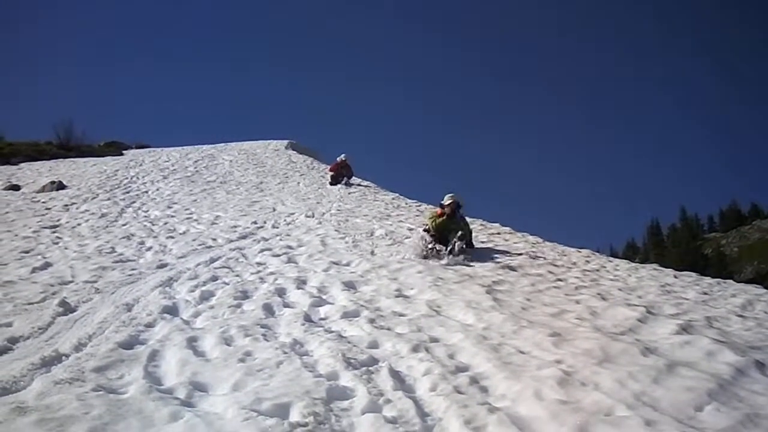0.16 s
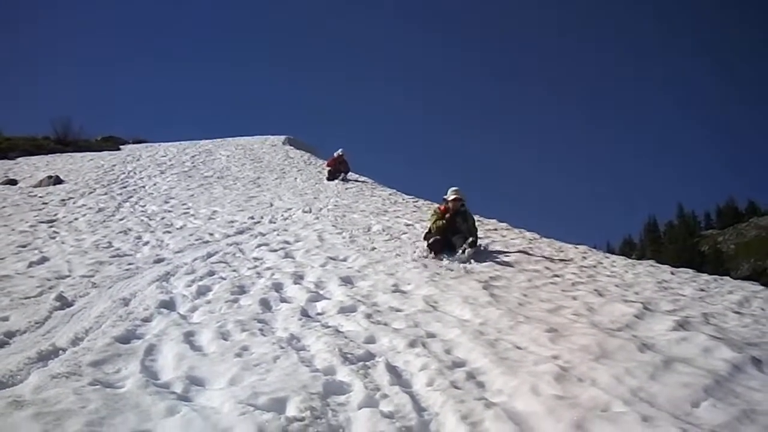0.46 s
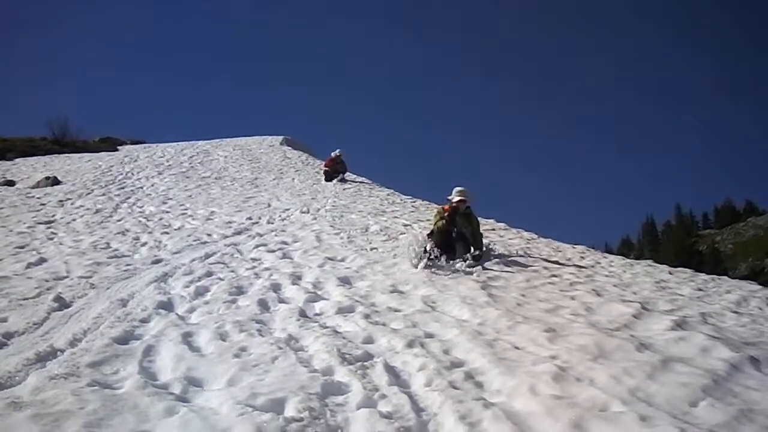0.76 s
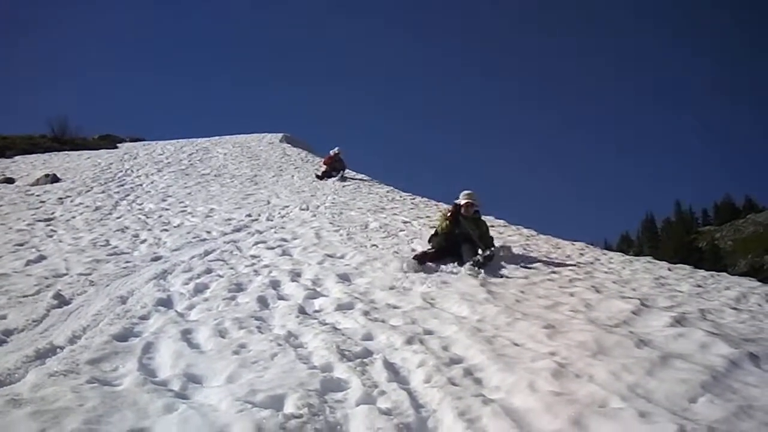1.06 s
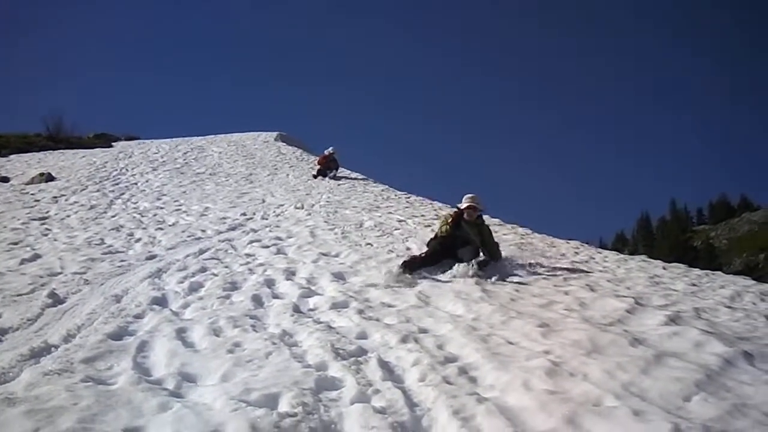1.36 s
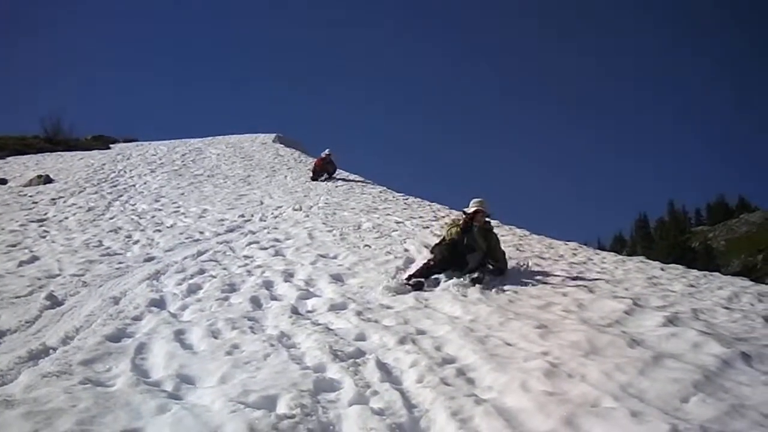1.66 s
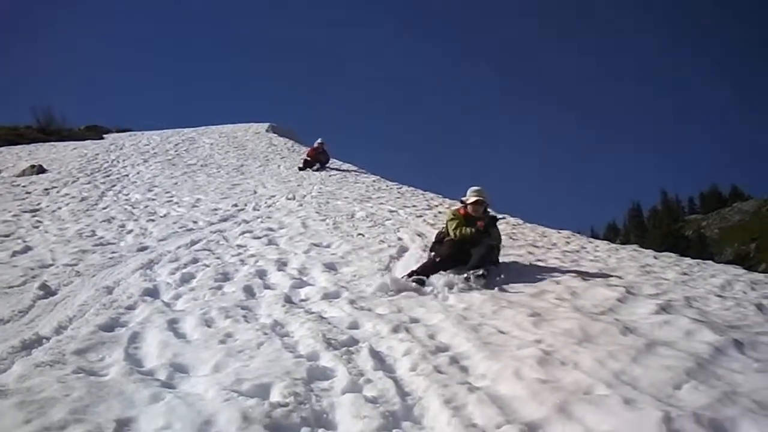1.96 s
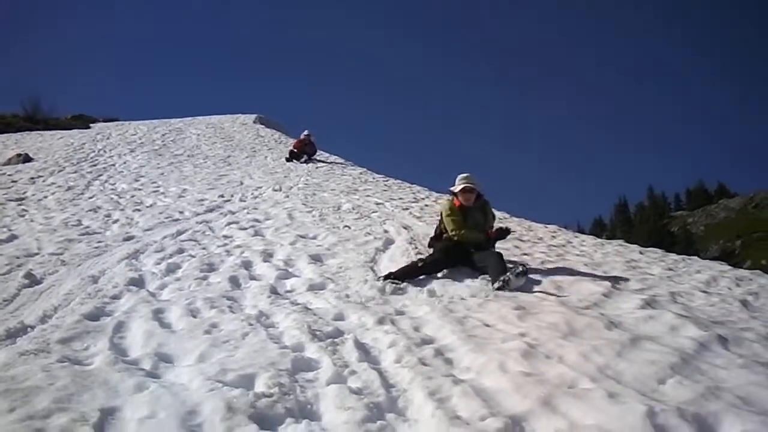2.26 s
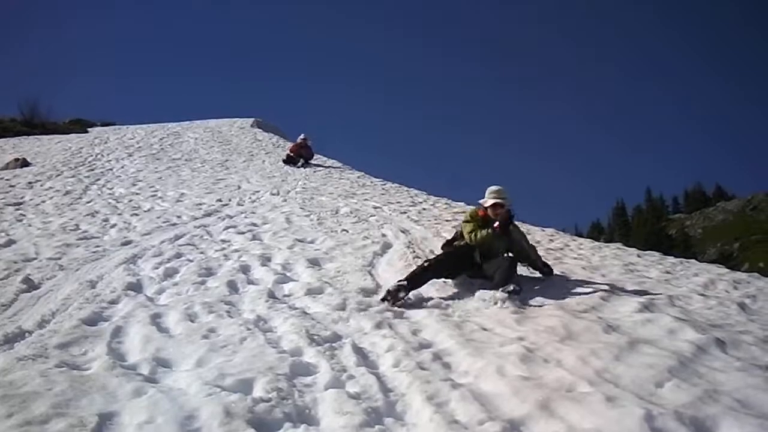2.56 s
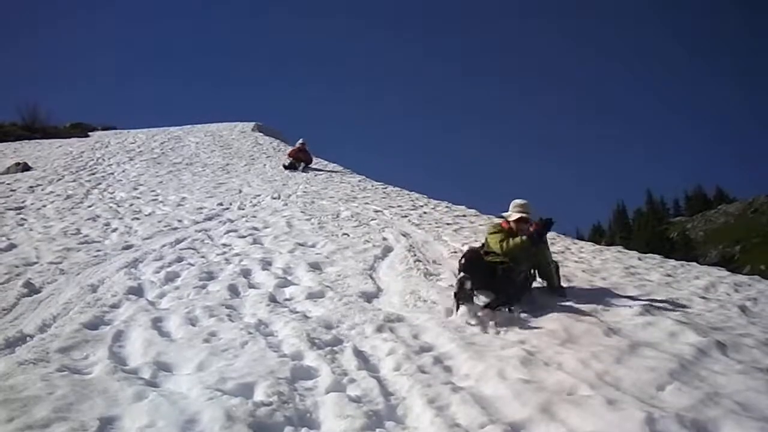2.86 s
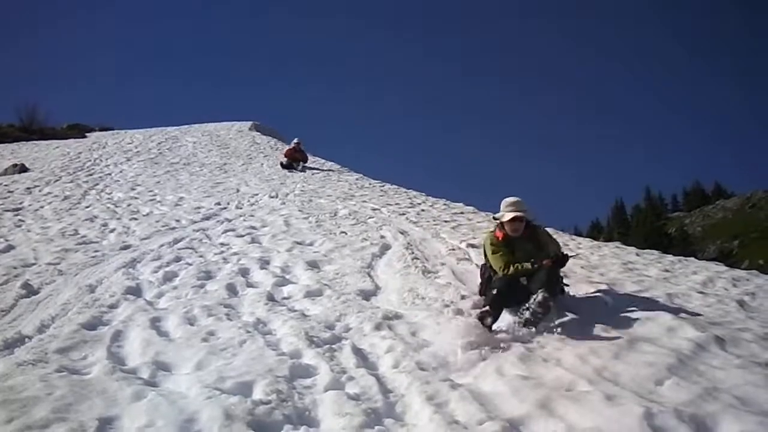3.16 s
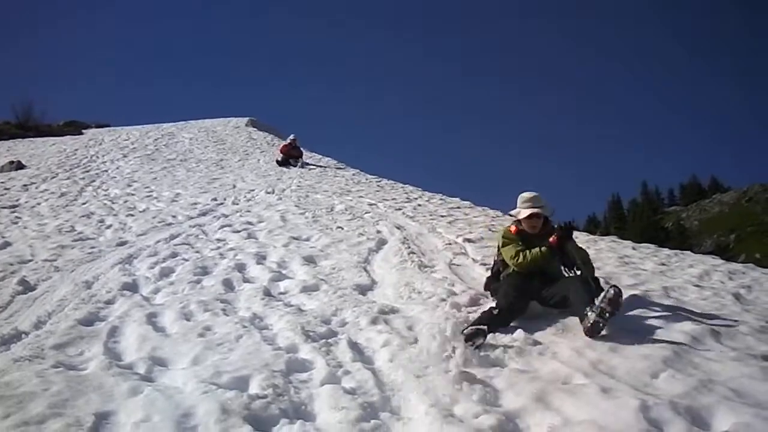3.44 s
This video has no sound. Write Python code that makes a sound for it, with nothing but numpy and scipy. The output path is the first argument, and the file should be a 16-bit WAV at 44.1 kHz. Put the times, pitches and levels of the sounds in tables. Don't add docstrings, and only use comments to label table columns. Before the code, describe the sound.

Sliding on coarse snow gives a continuous grainy hiss, rising over the first second. A short falling fabric rub and sharp tick come near 0.2 s, a hollow crunch and small crumbles at 0.3-0.5. A nylon swish swells and brightens from 0.5 to 1.3, another rushes 1.4-1.85. Then uneven hiss, a brief rub at 2.8, a longer crunch near 3.1, and slightly stronger hiss around 3.4. Soft low wind puffs until 1.9.

```python
import sys
import numpy as np
from scipy import signal
from scipy.fft import rfft, irfft, next_fast_len
from scipy.io import wavfile
from scipy.ndimage import uniform_filter1d, map_coordinates

SR = 44100
rng = np.random.default_rng(int(sys.argv[2]) if len(sys.argv) > 2 else 0)


def to_wav(s):
    ch = np.atleast_2d(s).T
    pcm = np.round(np.clip(ch, -1, 1) * 32767)
    wavfile.write(sys.argv[1], SR, pcm.astype(np.int16))


def natural_amplitude(level_db):
    exponent = np.asarray(level_db, float) / 20
    return 10 ** exponent


N = 158760


def unit(x):
    return x / np.sqrt(np.mean(x ** 2) + 1e-20)


def along(points, hz, below_db=None):
    f, v = np.transpose(points)
    return np.interp(np.log(hz + 1), np.log(f + 1), v, left=below_db)


def wobble(rate_hz):
    return map_coordinates(rng.standard_normal(200 * 4), [np.arange(N) * rate_hz / SR])


def filtered(x, response):
    m = next_fast_len(N + SR // 2)
    return irfft(rfft(x, m) * response(np.fft.rfftfreq(m, 1 / SR)), m)[..., :N]


def grit(clump_rate_hz, clump_db, spike_db):
    size_db = spike_db * rng.exponential(size=N)
    size_db = size_db + clump_db * wobble(clump_rate_hz)
    size_db = size_db + clump_db * wobble(clump_rate_hz / 3) / 2
    return unit(rng.standard_normal((2, N)) * natural_amplitude(size_db))


def shaped(x, gain_db, patchy_db):
    hz, t, z = signal.stft(x, SR, nperseg=512)
    patches = uniform_filter1d(rng.standard_normal(z.shape[1:]), size=6, axis=0)
    patches = uniform_filter1d(patches, size=8, axis=1)
    z = z * natural_amplitude(gain_db(hz[:, None], t) + patchy_db * unit(patches))
    return signal.istft(z, nperseg=512)[1][:, :N]


def humps(rows, edge):
    t = np.arange(N) / SR
    envelopes = []
    for start_s, db, length_s in rows:
        ramp_s = edge * length_s
        inside_s = np.minimum(t - start_s + ramp_s, start_s + length_s + ramp_s - t)
        rise = np.clip(inside_s / (2 * ramp_s), 0, 1)
        envelopes.append(natural_amplitude(db) * np.sin(np.pi / 2 * rise) ** 2)
    return envelopes


def slide():
    # (time [s], level [dB])
    pressure = [(0, -51), (.09, -50), (.3, -46), (.8, -44.5), (1.3, -44), (1.8, -44), (1.88, -47),
                (2.09, -43.3), (2.27, -46.7), (2.45, -43), (2.56, -45), (2.64, -43.5), (2.77, -46.3),
                (2.95, -44.5), (3.06, -45), (3.27, -43.2), (3.4, -41.5), (3.5, -43)]
    # (frequency [Hz], density [dB])
    snow_spectrum = [(70, -50), (120, -14.5), (350, -6.5), (1170, -3.5), (2600, -1.5), (5000, -4.5),
                     (7000, -5.5), (15000, -18.5)]
    hiss_over_pressure_db, spray_growth = 8, 0.27
    s, db = np.transpose(pressure)

    def push_db(t):
        return np.interp(t, s, db - db.mean())

    def colour_db(hz, t):
        treble = np.clip(np.log2(hz / 1000 + 1e-3), 0, 2) / 2
        return along(snow_spectrum, hz) + spray_growth * push_db(t) * treble

    grains = grit(clump_rate_hz=150, clump_db=.6, spike_db=1.5)
    hiss = unit(shaped(grains, colour_db, patchy_db=1.1))
    level_db = db.mean() + hiss_over_pressure_db + push_db(np.arange(N) / SR)
    return hiss * natural_amplitude(level_db + 0.13 * wobble(17))


def wind():
    # (time [s], level [dB], length [s])
    puffs = [(0, -55.5, 0.21), (.33, -57.5, 0.23), (.63, -66, .04), (.76, -89, 0.086), (1.1, -55, 0.11),
             (1.22, -56, 0.19), (1.45, -48.5, .1), (1.57, -58.5, 0.11), (1.67, -56, .05), (1.76, -55, 0.12),
             (2.8, -97, .2), (3.1, -77, 0.032), (3.28, -82, .05), (3.48, -89, .12)]
    # (frequency [Hz], density [dB])
    rumble = [(15, -22), (30, -0.5), (60, -1.5), (140, 5), (300, -13)]
    noise = rng.standard_normal((2, N))
    air = unit(filtered(noise, lambda hz: natural_amplitude(along(rumble, hz, -34) - 60 * (hz > 400))))
    lumps = unit(natural_amplitude(2.5 * np.array([wobble(30), wobble(30)])))
    return air * sum(humps(puffs, .2)) * lumps


def crunches():
    # (time [s], peak level [dB], length [s], hollow echo [s], tilt [dB per octave])
    heels = [
        (0.073, -56, 0.083, .0002, -9.5),
        (0.181, -33.5, 0.0034, .0002, 3.5),
        (.281, -32, .06, .00182, 2),
        (.358, -35, .012, .00093, -1),
        (0.397, -39.5, 0.021, .00093, 1),
        (0.432, -40, 0.018, .00093, 0.5),
        (0.517, -46, 0.052, .0002, 0),
        (2.916, -42, 0.075, 0.00025, 6.5),
        (3.087, -34, 0.14, 0.00029, 0),
    ]
    # (frequency [Hz], density [dB])
    crust = [(150, -30), (300, -9), (550, -6), (1100, -1), (2300, 0), (4000, -8), (7000, -15), (15000, -18)]
    echo_gain = .62
    grains = grit(clump_rate_hz=200, clump_db=1.1, spike_db=1.8)
    crumbs = unit(filtered(grains, lambda hz: natural_amplitude(along(crust, hz, -60))))

    def hollow(hz, echo_s):
        gain = np.clip(echo_gain * (echo_s / .002) ** .3, 0, .9) * (echo_s > .0005)
        return 1 / (1 - gain * np.exp(-2j * np.pi * hz * echo_s))

    def tilt(hz, db_per_oct):
        return natural_amplitude(db_per_oct * np.log2(np.clip(hz, 300, 6000) / 2000))

    total = 0
    envelopes = humps([row[:3] for row in heels], edge=.3)
    for envelope, (_, _, _, echo_s, db_per_oct) in zip(envelopes, heels):
        total = total + filtered(crumbs * envelope, lambda hz: hollow(hz, echo_s) * tilt(hz, db_per_oct))
    return total


def swish():
    # (time [s], level [dB], rubbing speed [octaves over 1 kHz])
    strokes = [
        [(.11, -51, 3), (.165, -35.5, 2.66), (.205, -35.5, 1.48), (.25, -44.5, 1.2)],
        [(.42, -55, 0.82), (.6, -37, 1.13), (.77, -33.5, 1.4), (.96, -28.5, 1.76), (1.07, -26, 2.63),
         (1.14, -30, 2.8), (1.2, -25.5, 2.54), (1.272, -29, 3.05), (1.3, -38, 2.9)],
        [(1.405, -39, 2.6), (1.435, -30, 3), (1.51, -28.5, 2.25), (1.56, -26.5, 2.54), (1.62, -27.5, 3),
         (1.77, -27, 2.95), (1.81, -29, 2.42), (1.85, -33, 1.6), (1.87, -56, 1.4)],
        [(2.78, -48, 3.7), (2.81, -36, 2.67), (2.835, -32, 2.54), (2.87, -45, 1.7)],
    ]
    # (frequency [Hz], width [Hz], gain [dB])
    folds = [(2760, 200, 4), (3760, 220, 6), (4720, 260, 8), (5700, 400, 3), (6950, 350, 5), (8550, 350, 3),
             (9400, 500, 3), (10450, 500, 4)]
    low_width_oct, high_width_oct, skirt_db = .5, .42, -12
    knee_oct, fast_rise_db = 1.53, 3.5
    s, db, speed_oct = np.transpose([(0, -90, 3)] + [row for stroke in strokes for row in stroke])

    def band_db(hz, t):
        octave = np.log2(hz / 1000 + 1e-3)
        top = np.interp(t, s, speed_oct)
        under = np.maximum(np.minimum(top, knee_oct) - octave, 0)
        over = np.maximum(octave - top, 0)
        peak = np.exp(-.5 * ((under / low_width_oct) ** 2 + (over / high_width_oct) ** 2))
        peak = peak * natural_amplitude(fast_rise_db * np.maximum(octave - knee_oct, 0))
        skirt = natural_amplitude(skirt_db - 1.3 * under - 3 * over) * (hz > 300)
        g = peak + skirt
        return 20 * np.log10(g / np.sqrt(np.mean(g ** 2, axis=0)) + 1e-6)

    def fold_gain(hz):
        rings_db = sum(gain_db / (1 + (2 * (hz - f) / width) ** 2) for f, width, gain_db in folds)
        return natural_amplitude(rings_db - 2.5)

    grains = grit(clump_rate_hz=200, clump_db=1.04, spike_db=0.5)
    rub = unit(shaped(grains, band_db, patchy_db=0.56))
    rub = rub * natural_amplitude(np.interp(np.arange(N) / SR, s, db) + 1.27 * wobble(35.38))
    return filtered(rub, fold_gain)


def ports(pair):
    # (frequency [Hz], correlation [0-1])
    alike = [(100, 0.62), (300, 0.93), (1200, 0.91), (2500, 0.91), (6000, 0.68), (13000, 0.91)]
    # (frequency [Hz], left over right [dB])
    shade = [(300, 1.5), (3500, 0), (6500, -2.5), (9200, -9.5), (11400, -6), (14000, 1.5)]
    # (frequency [Hz], left phase [rad])
    lead = [(300, -0.24), (3400, -0.37), (7200, -1.22), (10500, -0.44), (14500, -1.1)]

    def spread(hz):
        angle = np.arccos(np.clip(along(alike, hz), 0, 1)) / 2
        return np.array([np.cos(angle), np.sin(angle)])

    def left_right(hz):
        half = natural_amplitude(along(shade, hz) / 2) * np.exp(.5j * along(lead, hz))
        return np.array([half, 1 / half])

    mid, side = filtered(pair, spread)
    return filtered(np.array([mid + side, mid - side]), left_right)


def scene():
    low_cut_hz = 83
    snow = slide() + crunches() + swish()
    snow = filtered(snow, lambda hz: 1 / np.sqrt(1 + (low_cut_hz / (hz + 1)) ** 12))
    return ports(snow) + wind()


def top_cut(x):
    return signal.sosfilt(signal.butter(12, 15610, fs=SR, output="sos"), x)


def record(dry):
    # (frequency [Hz], gain [dB])
    capsule = [(5000, 2), (7600, 0), (8600, 2), (10300, 5.5), (12500, 8), (14800, -3)]
    notch_hz, notch_width_hz, top_hz = 7880, 370, 15100
    dc_offset = .0023

    def response(hz):
        notch = (hz - notch_hz) / (hz - notch_hz - .5j * notch_width_hz)
        return natural_amplitude(along(capsule, hz)) * notch * (hz < top_hz)

    return top_cut(filtered(dry, response) + dc_offset)


dry = scene()
out = record(dry)
to_wav(out)
```